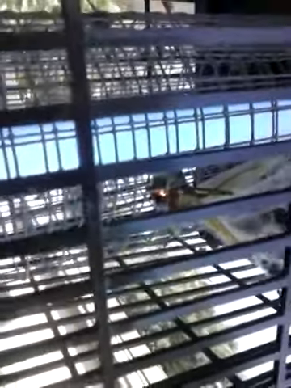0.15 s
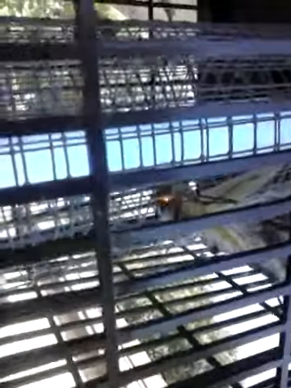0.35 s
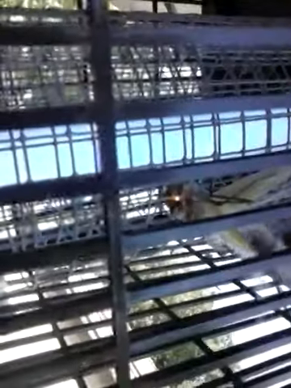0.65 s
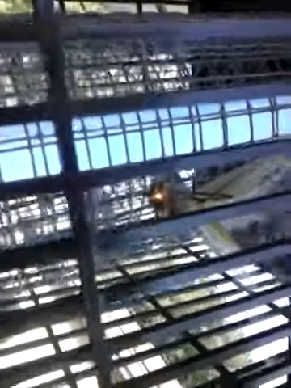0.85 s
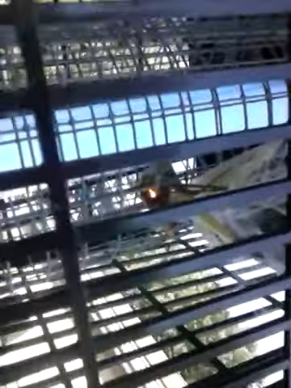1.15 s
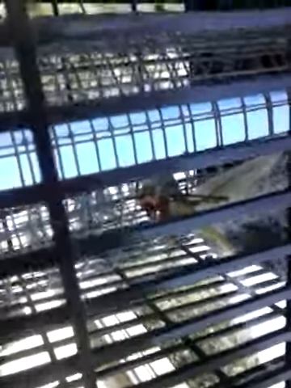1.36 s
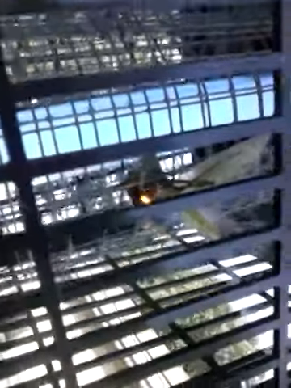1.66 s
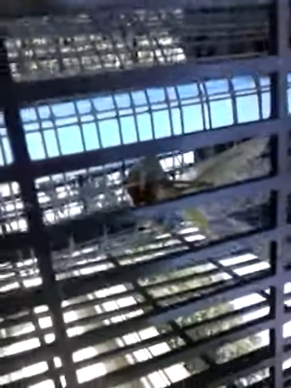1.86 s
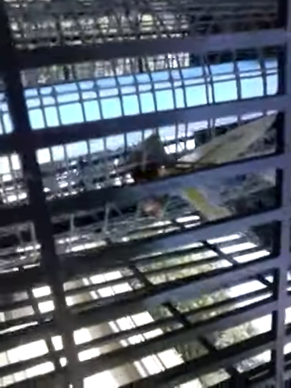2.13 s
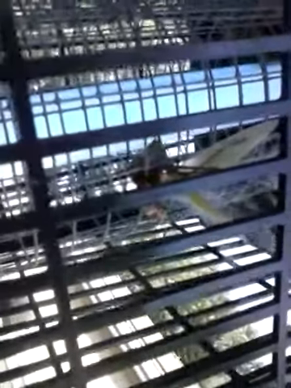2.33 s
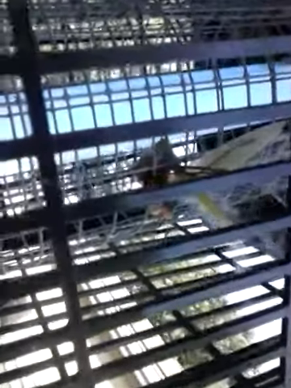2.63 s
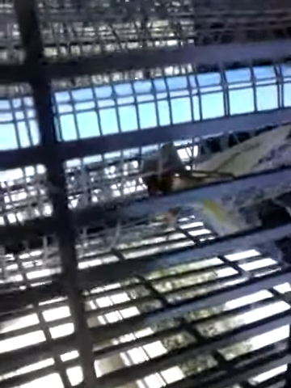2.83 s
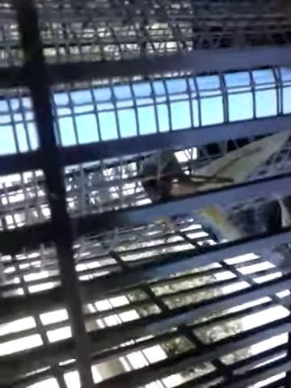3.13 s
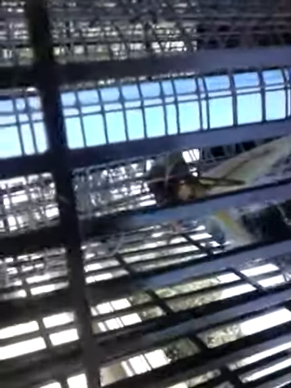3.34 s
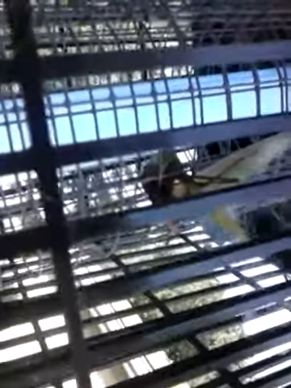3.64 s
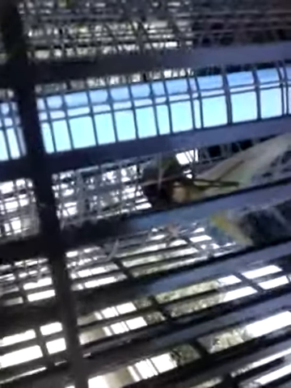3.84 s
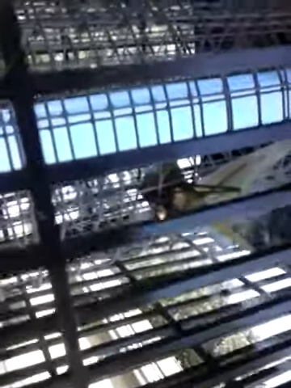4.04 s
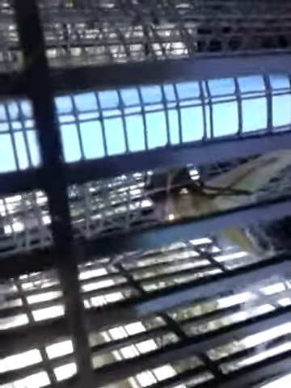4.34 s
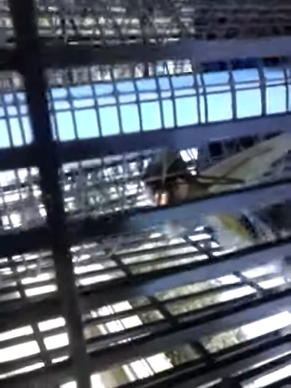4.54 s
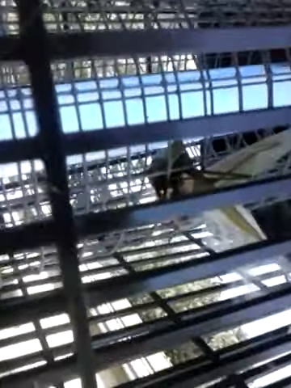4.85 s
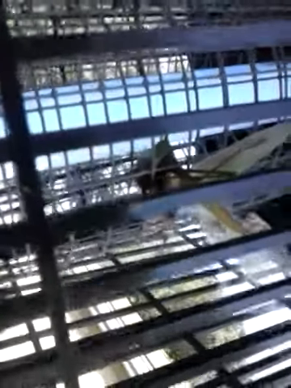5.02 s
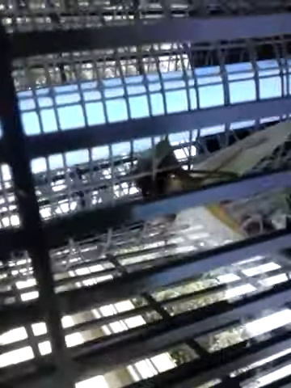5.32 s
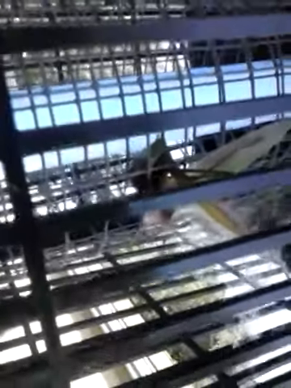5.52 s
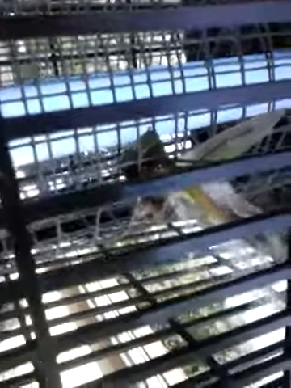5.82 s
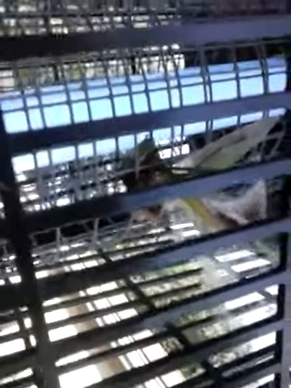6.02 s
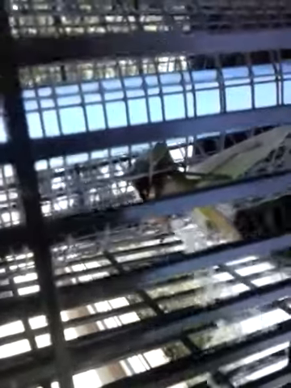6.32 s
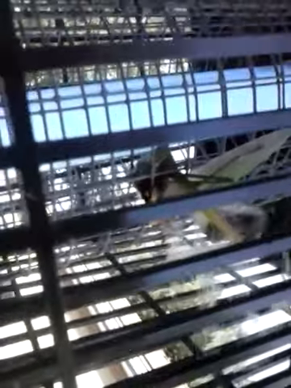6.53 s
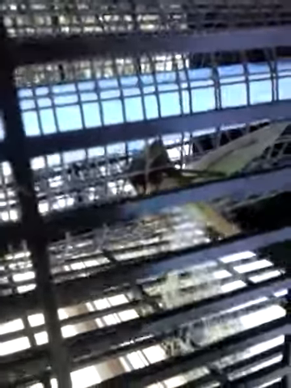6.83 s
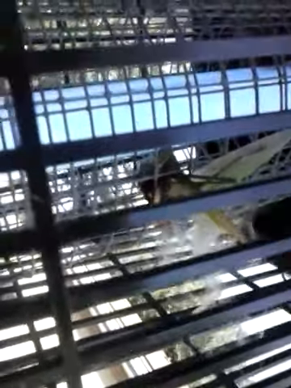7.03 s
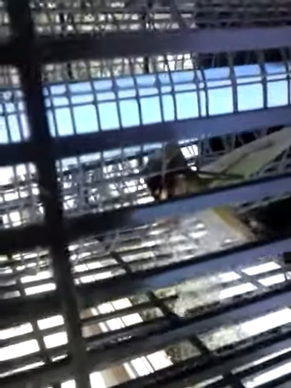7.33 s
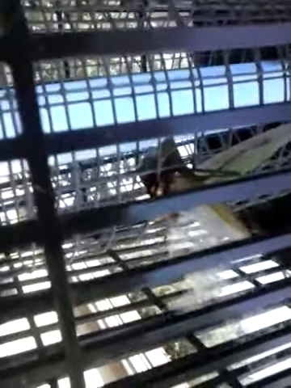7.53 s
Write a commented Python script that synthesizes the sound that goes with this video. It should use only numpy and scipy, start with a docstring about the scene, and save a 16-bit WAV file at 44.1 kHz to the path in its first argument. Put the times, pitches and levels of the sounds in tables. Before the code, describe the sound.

Close electric bug zapper arcs in a harsh, rattling 120-a-second buzz, swelling and faltering, then drops to faint crackle with late flares and distant birds.

```python
"""Bug zapper at close range

A large insect is caught on the high-voltage grid of a bug zapper, close to the microphone, outdoors.
Twice in each 60 Hz mains cycle an arc strikes at it: a crack and a sputter of small sparks, all ringing
the cage; a fizz follows once a cycle, and single snaps stand out. The arc swells, falters and drops to a
faint crackle with late flares. Behind it are the transformer's summed harmonics, shaped outdoor noise,
and distant birds made of narrow noise carried along falling or arched pitches."""
import sys
import numpy as np
from scipy import signal
from scipy.fft import rfft, irfft
from scipy.io import wavfile
from scipy.ndimage import uniform_filter1d

SR = 44100
rng = np.random.default_rng(int(sys.argv[2]) if len(sys.argv) > 2 else 0)


def store_wav(level_fs):
    """Save 16-bit WAV to argv[1]."""
    pcm = np.round(np.clip(np.atleast_2d(level_fs), -1, 1) * 32767)
    wavfile.write(sys.argv[1], SR, pcm.T.astype(np.int16))


N = 338247
TIME = np.arange(N) / SR
MAINS_HZ = 60

# Strength of the arc through the insect. Each row: time in seconds, relative crack strength in dB.
ARC_STRENGTH = [(0, -15), (0.4, -21), (0.68, -23), (1.02, -15), (1.5, -16), (1.56, -3), (1.7, -9),
                (2.5, -10), (2.89, -5), (2.98, -11), (3.28, -16), (3.62, -8), (3.79, -3.5), (3.89, -9),
                (4.02, -7.5), (4.17, -7), (4.46, -11), (4.69, -23.5), (4.8, -43), (6.58, -38.5),
                (6.86, -17), (7.03, -26), (7.38, -31.5), (7.67, -33.5)]
# How far the insect is charred, which makes the sparks thin and shrill.
# Each row: time in seconds, share from 0 to 1.
CHARRED_SHARE = [(4.5, 0), (4.62, .9), (6.6, 1), (6.85, .55), (7.15, .72), (7.35, .9)]


def amp(db):
    """Decibels to gain."""
    return 10 ** (np.asarray(db) / 20)


def unit(x):
    """Scales to rms 1."""
    return x / np.sqrt(np.mean(x ** 2) + 1e-20)


def curve(rows, t):
    """The columns of a table, interpolated at times t."""
    s, *columns = np.transpose(rows)
    return [np.interp(t, s, column) for column in columns]


def spectrum(points, hz):
    """Reads a table on a log-frequency axis."""
    f, value = np.transpose(points)
    return np.interp(np.log(hz + 1), np.log(f + 1), value)


def add(mix, s, sound):
    """Mixes a sound in at time s."""
    part = mix[max(round(s * SR), 0):][:len(sound)]
    part += sound[:len(part)]


def sparks(size, per_s=7000, spread=0.45):
    """A dense random train of tiny discharges of uneven size and either sign, mean power 1."""
    chance = min(per_s / SR, 1)
    height = np.exp(spread * rng.standard_normal(size) - spread ** 2)
    height = height * rng.choice([-1, 1], size)
    return height * (rng.random(size) < chance) / np.sqrt(chance)


def flaring(t):
    """The body flares up and spits: gains of sputter and fizz, each flare rising, holding, dying away."""
    # Each row: start in seconds, length in seconds, relative sputter level in dB, relative fizz level in dB.
    flares = [(0, 0.034, -26.5, -40), (0.088, 0.23, -31, -34), (0.315, 0.11, -36.5, -34),
              (1.227, 0.077, -32, -34), (1.34, 0.19, -24, -27), (1.561, .38, -29, -55),
              (1.945, .12, -23, -36), (2.296, .27, -29.5, -35), (2.576, 0.061, -23.5, -52),
              (2.825, .08, -35, -51), (3.39, .07, -37.5, -44), (3.534, 0.1, -31.5, -26.5),
              (3.731, 0.062, -32, -44), (3.941, 0.073, -25.5, -53), (4.394, 0.083, -28.5, -57),
              (4.527, 0.11, -35.5, -37), (5.8, .15, -56, -42), (6.052, 0.14, -63, -49),
              (6.416, 0.42, -70, -43), (6.794, 0.11, -43, -29), (6.982, 0.22, -60, -42.5),
              (7.104, 0.073, -42, -28.5), (7.277, 0.15, -39, -37.5), (7.41, 0.2, -69, -41)]
    rise_s, fall_s = 0.018, 0.02
    gains = np.zeros((2, len(t)))
    for start, length, *levels_db in flares:
        rise = np.clip((t - start) / rise_s, 0, 1)
        fall = np.exp(-np.maximum(t - start - length, 0) / fall_s)
        gains = np.maximum(gains, amp(levels_db)[:, None] * rise * fall)
    return gains


def contact(t):
    """How the insect touches the grid: drop in dB, scatter in dB and chance of a failed forward strike."""
    # The insect lifts off the wire and the arc sinks.
    # Each row: start in seconds, length in seconds, drop in dB (negative).
    lifts = [(1.526, .017, -18), (2.735, .058, -3.5), (2.933, .016, -20), (3.033, .043, -6),
             (3.159, .016, -18), (3.3, .007, -18), (3.692, .007, -18), (3.807, .077, -15),
             (4.05, .167, -13), (4.226, .015, -20), (4.284, .007, -18), (4.309, .015, -15),
             (4.57, .048, -10)]
    # It hangs loosely, so that forward strikes often fail. Each row: start in seconds, end in seconds.
    loose_spells = [(2.98, 3.2), (4.05, 4.24), (4.51, 4.78)]
    firm_scatter_db, loose_scatter_db, dry_scatter_db = 2.44, -0.5, 6
    drop_db = sum(db * ((t > start) & (t < start + length)) for start, length, db in lifts)
    loose = sum((t > start) & (t < end) for start, end in loose_spells)
    charred, = curve(CHARRED_SHARE, t)
    firm_db = firm_scatter_db + charred * (dry_scatter_db - firm_scatter_db)
    scatter_db = np.where(loose, loose_scatter_db, firm_db)
    return drop_db, scatter_db, 0.6 * loose


def arc(reverse_crack_db=0.85, reverse_sputter_db=-2.0, burn_ms=2.89, fizz_ms=8.98, fizz_width_ms=1.12,
        crack_db=-1.05, sputter_db=0.75, fizz_db=-2.0, miss_db=-18, restrike=0.61, burn_spread=0.36):
    """The gap breaks down twice a mains cycle: cracks, small sparks after them, dull ticks when it fails."""
    # Breakdown within the cycle; the forward strike comes later as the contact burns back.
    forward_ms, reverse_ms, fresh_early_ms, burn_back_s = 3.95, 12.45, 0.8, 2.3
    # A flare whose sputter is this loud keeps the gap hot: sooner breakdown, softer crack, longer burn.
    hot_db, hot_early_ms, hot_crack_db, hot_burn_ms = -22, 0.6, -10, 1
    # A steady arc sputters and fizzes in proportion to its strength.
    calm_sputter_db, calm_fizz_db = -32, -30.5
    # When the open spark fails, the current still ticks dully inside the body.
    dull_db = 0.5

    cycle = np.arange(int(N / SR * MAINS_HZ)) / MAINS_HZ
    forward_ms = forward_ms - fresh_early_ms * np.exp(-cycle / burn_back_s)
    strikes = np.c_[cycle + forward_ms / 1e3, cycle + reverse_ms / 1e3].ravel()
    polarity = 2 * (np.arange(len(strikes)) % 2) - 1  # the gap is lopsided: -1 forward, +1 reverse
    jitter, size, burn, late, again = rng.standard_normal((len(strikes), 5)).T
    strength_db, = curve(ARC_STRENGTH, strikes)
    sputter, fizz = flaring(strikes)
    drop_db, scatter_db, miss_chance = contact(strikes)

    hot = np.minimum(sputter / amp(hot_db), 1) ** 2
    strikes = strikes - hot_early_ms / 1e3 * hot + 1.1e-4 * jitter
    restrikes = strikes + 6e-4 * np.exp(0.45 * again)
    missed = (rng.random(len(strikes)) < miss_chance) * (polarity < 0)
    drop_db = np.minimum(drop_db, miss_db * missed)
    luck_db = scatter_db * np.minimum(size + 0.047, 0.6) + drop_db  # the supply caps the strongest strikes

    height = amp(crack_db + strength_db + hot_crack_db * hot + luck_db + reverse_crack_db * polarity)
    sputter = np.hypot(sputter, amp(strength_db + calm_sputter_db))
    sputter = sputter * amp(sputter_db + luck_db + reverse_sputter_db * polarity)
    fizz = np.hypot(fizz, amp(strength_db + calm_fizz_db))
    fizz = fizz * amp(fizz_db + drop_db + scatter_db * np.minimum(late, 0.7))
    dull = amp(strength_db + dull_db) * (1 - amp(drop_db))

    ms = np.arange(SR // MAINS_HZ) * 1e3 / SR
    burns_ms = (burn_ms + hot_burn_ms * hot) * np.exp(burn_spread * burn)
    cracks, glow, ticks = np.zeros((3, N))
    for k, s in enumerate(strikes):
        add(cracks, s, [height[k]])
        add(ticks, s, [dull[k]])
        add(cracks, restrikes[k], [restrike * height[k]])  # the grid recharges and sparks again
        add(glow, s, sputter[k] * np.exp(-(ms / burns_ms[k]) ** 4))
        if polarity[k] < 0:  # the arc breaks up again as the forward current falls
            bump = np.exp(-((ms - fizz_ms) / fizz_width_ms) ** 2 / 2)
            add(glow, cycle[k // 2], fizz[k] * bump)
    return -cracks, glow * sparks(N), -ticks


def snaps(level_db=-1.0, front=1.4):
    """Single snaps: a first crack with a burst of sparks on its heels."""
    # Each row: start in seconds, relative energy in dB, length in ms (two samples at least).
    snap_list = [(0.0122, -5, 2.5), (0.029, -5, 2), (0.5368, -13, 3.2), (1.3537, -3, 3.8), (1.3956, 2, 3),
                 (1.4124, 2.5, 2.5), (1.9461, 3.6, 2.8), (1.9793, 4.1, 2.1), (2.596, 0, 1.5),
                 (2.6459, -3, .3), (2.6793, -4, .3), (2.7959, -4, .3), (2.8459, -3, .3), (3.0125, -11, .1),
                 (3.0293, -11, .1), (3.0793, -10, .1), (3.1792, -10.7, .1), (3.3126, -11.7, .1),
                 (3.5038, -1.2, 3.4), (3.9541, -1.4, .5), (4.1794, -12, .1), (4.2127, -9.3, .1),
                 (4.2207, -5, .1), (4.2627, -4.2, .1), (4.4539, .8, 1), (4.4876, -.6, 1.6),
                 (4.6213, -1.1, 2.2), (4.6375, -4.2, 4.5), (4.6871, -16, .1), (4.7376, -19, 5.1),
                 (5.791, -16.5, 1.8), (5.809, -16, .4), (5.8549, -15.3, 4.5), (6.141, -14, 1.3),
                 (6.1556, -15.7, 2.4), (6.5051, -13.8, 3.6), (6.7541, -14, 3.5), (6.7713, -15, 4),
                 (7.1042, -6.7, 1.2), (7.121, -4.5, 2.8), (7.1376, -2.4, 4.6)]
    out = np.zeros(N)
    for s, db, length_ms in snap_list:
        size = max(int(length_ms * SR / 1e3), 2)
        burst = sparks(size, per_s=13000, spread=0.044) * np.linspace(1, 0.5, size)
        burst[0] = -2 * front
        add(out, s, amp(db + level_db) * burst / np.linalg.norm(burst))
    return out


def cage(x, thump_db, thump_hz, lift_db, lift_hz=7400):
    """Sparks ring the cage; a full breakdown also pushes out a low thump, small sparks are shriller."""
    # Resonances of cage and housing. Each row: centre in Hz, width in Hz, relative level in dB.
    resonances = [(1596, 1370, -10), (1827, 710, -7), (2857, 840, -5.5), (3354, 580, -1), (4295, 594, 1.5),
                  (5104, 710, -0.5), (5966, 470, 0), (6550, 590, 1), (7250, 1130, 2.5), (7950, 1180, 0),
                  (9000, 140, -6), (9530, 810, -4), (10700, 300, -6.5), (11650, 230, -6.5),
                  (12070, 350, -5.5), (13380, 400, -3.5), (15700, 1400, -8), (14600, 380, -10.5)]
    # A reflection inside the housing cancels one band: centre in Hz, width in Hz, depth in dB.
    cancelled_band = (2320, 304, -12)
    hz = abs(np.fft.fftfreq(4096, 1 / SR))
    power = sum(amp(db) ** 2 / (1 + (2 * (hz - f) / width) ** 2) ** 2 for f, width, db in resonances)
    power = power * hz ** 4 / (hz ** 4 + thump_hz ** 4)  # the cage radiates little bass
    thump = hz ** 4 / (hz ** 4 + 190 ** 4) / (1 + (hz / thump_hz / 2) ** 2)
    power = power + amp(thump_db) ** 2 * thump
    for f, width, db in (cancelled_band, (lift_hz, 1900, lift_db)):
        power = power * amp(db * np.exp(-((hz - f) / width) ** 2)) ** 2
    log_gain = np.log(power / power.mean() + 1e-8) / 2
    # minimum phase: sharp front, short ring
    ring = np.fft.ifft(np.exp(np.conj(signal.hilbert(log_gain)))).real
    return signal.oaconvolve(x, ring)[:N]


def muffled(ticks):
    """Ticks inside the body reach the cage without their treble."""
    lowpass = signal.butter(4, 1920, fs=SR, output="sos")
    return cage(signal.sosfilt(lowpass, ticks), thump_db=-18, thump_hz=625, lift_db=4.5)


def room(x, apart=0.04):
    """A diffuse tail of sparse reflections around the unit, nearly alike at the two microphones."""
    # Each row: frequency in Hz, time to decay by 60 dB in seconds.
    decay_times = [(300, 0.36), (2000, 0.57), (7000, 0.04), (15000, 0.27)]
    size = SR // 2
    sparse = rng.random((2, size)) < 5000 / SR
    after_gap = np.arange(size) > 0.002 * SR
    taps = rng.standard_normal((2, size)) * sparse * after_gap
    hz, t, z = signal.stft(taps, SR, nperseg=256)
    decay = amp(-60 * t / spectrum(decay_times, hz)[:, None])
    tail = signal.istft(z * decay, SR, nperseg=256)[1]
    mid, side = signal.fftconvolve(x[None], tail / np.linalg.norm(tail[0]), axes=1)[:, :N]
    return np.array([mid + apart * side, mid - apart * side])


def hum(flicker_db=3, flare_db=-29):
    """Mains harmonics of the transformer, which growls unsteadily as the arc draws current."""
    # Each row: frequency in Hz, rms level at rest in dB, level relative to the load in dB.
    harmonics = [(60, -75, -26), (120, -88, -12), (240, -86, -4), (360, -86, -6), (480, -87, -14),
                 (540, -89, -20), (1440, -84, -20), (1680, -83, -20)]
    # Load level under a 0 dB arc, dB per dB of arc strength, and change in a full flare in dB.
    load_db, load_slope, load_flare_db = -65, 0.68, -11
    smooth = uniform_filter1d(rng.standard_normal(N), size=1200)
    flicker = unit(uniform_filter1d(smooth, size=800))
    frames = TIME[::256]
    flare = np.interp(TIME, frames, np.minimum(flaring(frames)[0] / amp(flare_db), 1))
    strength_db, = curve(ARC_STRENGTH, TIME)
    load_db = load_db + load_slope * strength_db + load_flare_db * flare + flicker_db * flicker
    out = np.zeros(N)
    for hz, rest_db, loaded_db in harmonics:
        level = np.hypot(amp(rest_db), amp(load_db + loaded_db))
        out += np.sqrt(2) * level * np.sin(2 * np.pi * (hz * TIME + rng.random()))
    return out


def air(level_db=-55.97, side_db=-23):
    """Soft outdoor noise, shaped in frequency and nearly alike at the two microphones."""
    # Each row: frequency in Hz, relative density in dB per Hz.
    noise_colour = [(20, -11), (35, -12), (50, -3), (80, -11), (110, -9), (160, -16), (247, -16),
                    (287, -16), (481, -16), (935, -22), (1730, -17), (2380, -25), (3710, -17), (4520, -3),
                    (5650, -17), (7400, -13), (11300, -29), (15500, -28)]
    colour = amp(spectrum(noise_colour, np.fft.rfftfreq(N, 1 / SR)))
    mid, side = unit(irfft(rfft(rng.standard_normal((2, N))) * colour, N))
    side = amp(side_db) * side
    return amp(level_db) * np.array([mid + side, mid - side])


def whistle(hz, width_hz):
    """A fuzzy tone: narrow noise carried along a pitch curve."""
    noise = rng.standard_normal((len(hz), 2)) @ [1, 1j]
    slow = signal.sosfilt(signal.butter(2, width_hz / 2, fs=SR, output="sos"), noise)
    return unit((slow * np.exp(2j * np.pi * np.cumsum(hz) / SR)).real)


def birds(trill_hz=4760, arch_hz=330, trill_width_hz=90, lower_hz=4270, lower_db=-4,
          fall_hz=480, chirp_s=0.12, level_db=5.5):
    """Distant birds, blurred by the way: arched buzzy notes with a lower band, and falling chirps."""
    # A far bird repeats a buzzy note. Each row: middle in seconds, relative level in dB.
    trills = [(0.547, -60), (3.134, -62), (3.821, -59), (4.135, -63), (4.822, -58.5), (5.143, -58.5),
              (5.591, -56), (5.907, -56), (6.283, -56), (6.658, -59), (6.98, -60), (7.326, -59),
              (7.67, -61)]
    # Another answers with chirps. Each row: start in seconds, relative level in dB, starting pitch in Hz.
    chirps = [(4.759, -57, 4770), (4.98, -65, 4800), (5.21, -59, 4400), (5.255, -59, 4720),
              (5.319, -77, 4300), (5.759, -59, 4500), (6.098, -61, 4750), (6.251, -63, 4460),
              (6.64, -63, 4500), (6.739, -58, 4820), (7.21, -60, 4740)]
    # Each buzzy note is a quick run of little falling slurs.
    trill_s, slurs_per_s, slur_hz = 0.255, 28, 220
    out = np.zeros(N)
    u = np.linspace(-1, 1, int(trill_s * SR))
    for s, db in trills:
        slur = (slurs_per_s * trill_s * u / 2 + rng.random()) % 1 - 0.5
        note = whistle(trill_hz - arch_hz * u ** 2 - slur_hz * slur, width_hz=trill_width_hz)
        note += amp(lower_db) * whistle(np.full(len(u), lower_hz), width_hz=310)
        add(out, s - trill_s / 2, amp(db) * np.hanning(len(u)) * note)
    u = np.linspace(0, 1, int(chirp_s * SR))
    for s, db, hz in chirps:
        add(out, s, amp(db) * np.sin(np.pi * u) * whistle(hz - fall_hz * u, width_hz=74))
    return amp(level_db) * out


def scene(room_db=-15, widening_db=-25):
    """The zapper close by, with hum, outdoor noise and distant birds around it."""
    cracks, sizzle, ticks = arc()
    sizzle = sizzle + snaps()
    charred, = curve(CHARRED_SHARE, TIME)
    zapper = cage(cracks, thump_db=-18.5, thump_hz=606, lift_db=-3.5)
    zapper += muffled(ticks)
    zapper += cage(sizzle * (1 - charred), thump_db=-37, thump_hz=1340, lift_db=-0.5)
    zapper += cage(sizzle * charred, thump_db=-34, thump_hz=1500, lift_db=7.5, lift_hz=8400)
    # a faint, slightly delayed copy of the zapper, opposite in sign left and right, widens it a little
    delayed = amp(widening_db) * np.roll(zapper, SR // 700)
    close = zapper + np.array([delayed, -delayed])
    return close + amp(room_db) * room(zapper) + hum() + air() + birds()


def record(dry):
    """The microphone rounds off the tallest cracks; then a low-pass filter limits the band."""
    rounded = 0.55 * np.tanh(dry / 0.55)
    lowpass = signal.firwin(401, 15950, window=("kaiser", 8), fs=SR)  # edge in Hz
    return signal.oaconvolve(rounded, lowpass[None], "same")


dry = scene()
out = record(dry)
store_wav(out)
```